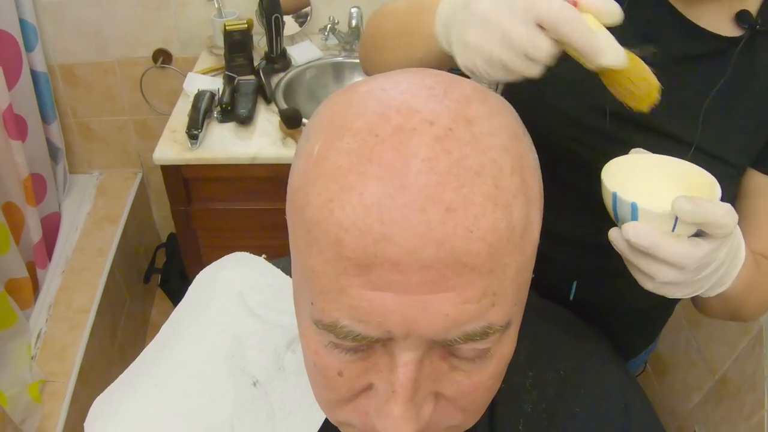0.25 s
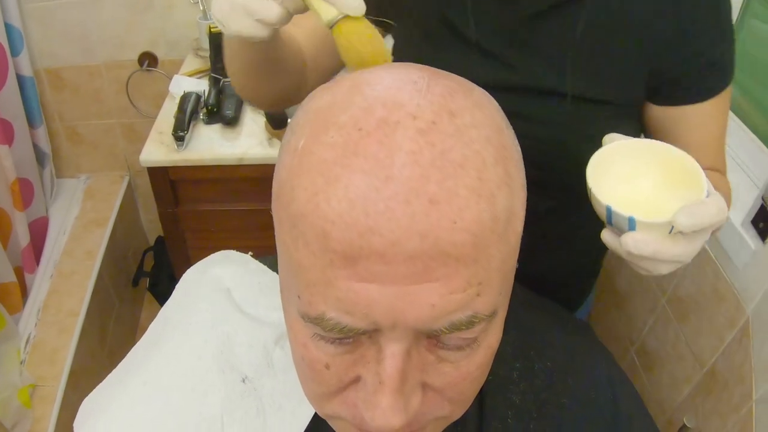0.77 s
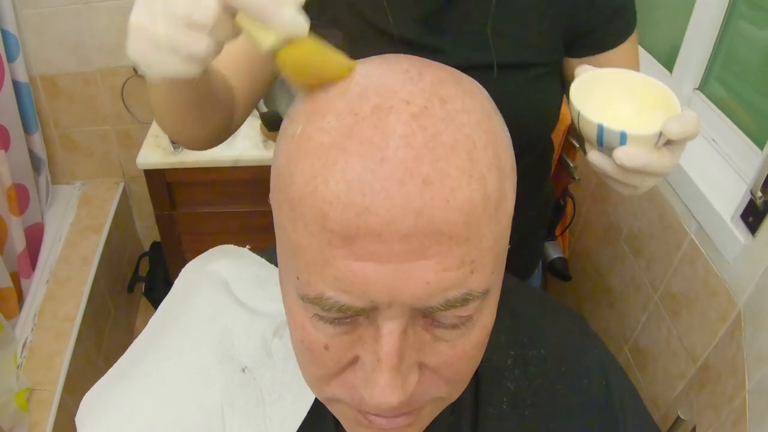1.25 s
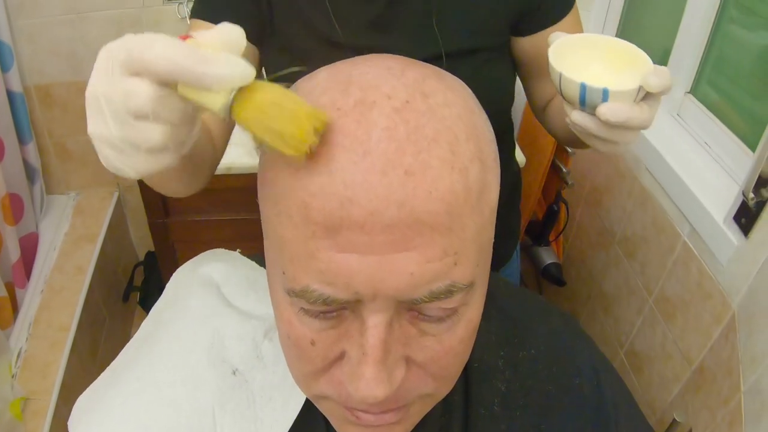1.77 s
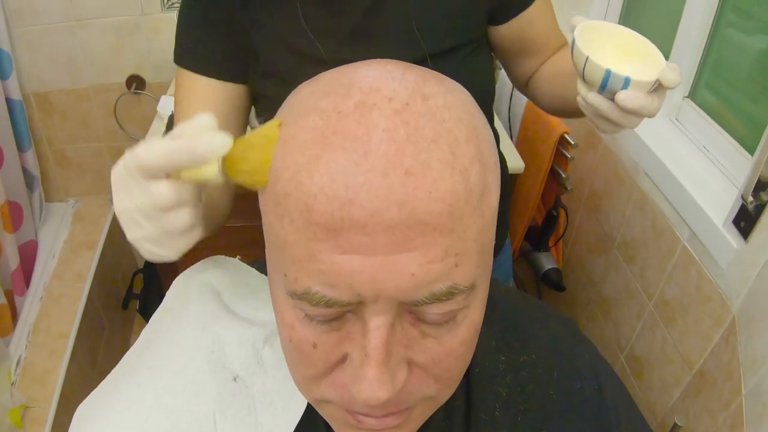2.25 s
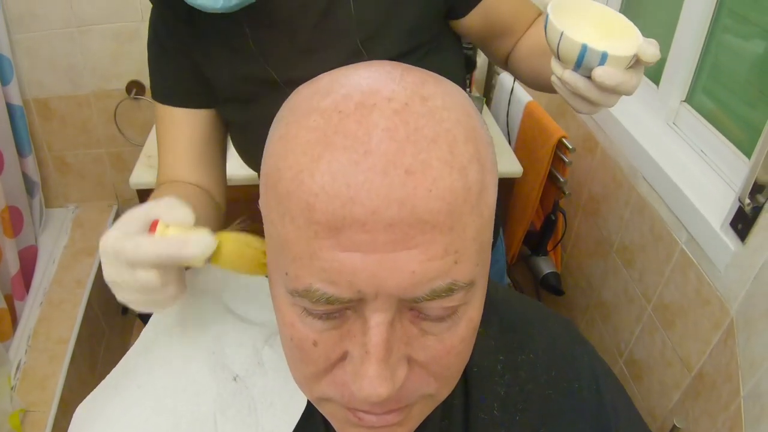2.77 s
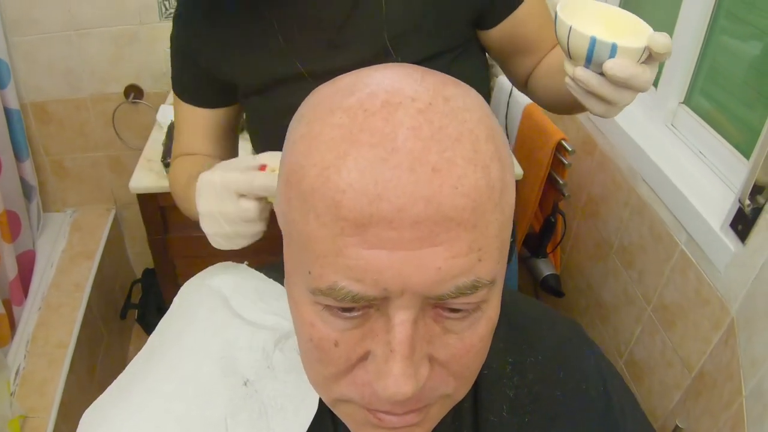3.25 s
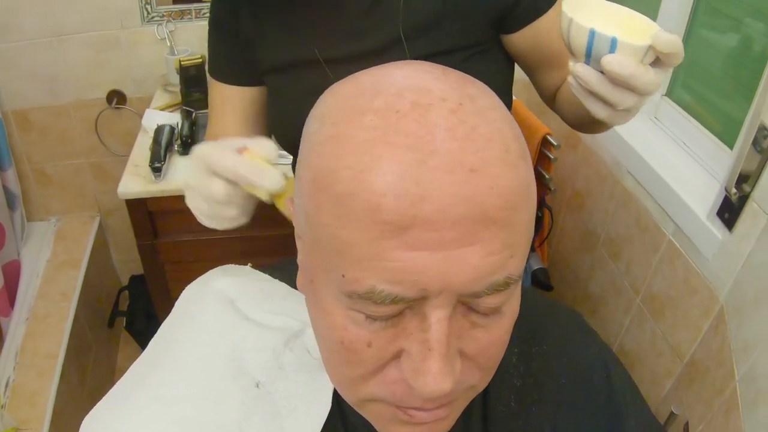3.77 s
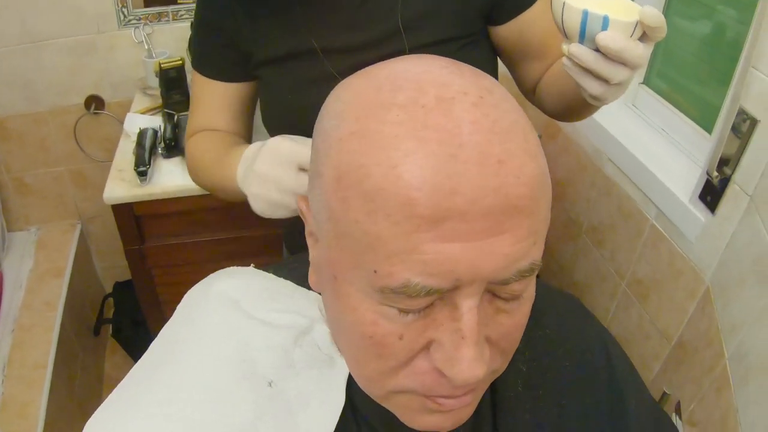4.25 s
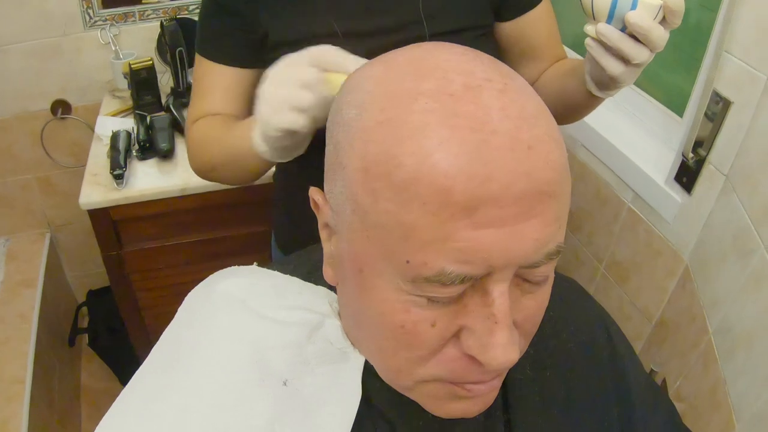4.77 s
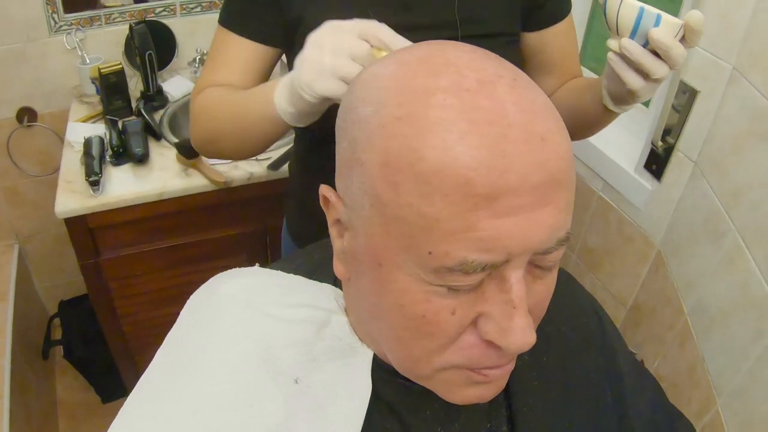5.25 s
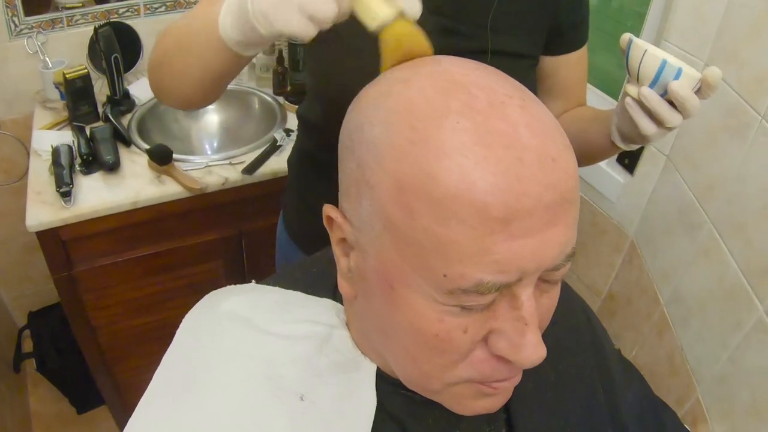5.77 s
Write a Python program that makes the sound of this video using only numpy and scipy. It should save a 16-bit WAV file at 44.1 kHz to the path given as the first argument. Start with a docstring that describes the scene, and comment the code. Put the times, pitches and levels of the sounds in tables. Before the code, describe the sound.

Close, quiet bristle strokes drag wet lather across skin, fizzing and ticking lightly over low room rumble, with a single dull thump midway.

```python
"""A soft brush works thin lather over a bare scalp in a small tiled room, about seven strokes a second.
Bristles slip on the skin in dense tiny clicks, heard as bright tips, a mid-range drag and a wet smear.
Bubbles burst in short rings under the brush, foam ticks now and then, something thumps softly once.
Under it lie shaped noise for hiss, rumble and low mids, a wavering hum and a slow pressure sway."""
import sys
import numpy as np
from scipy import signal
from scipy.fft import rfft, irfft
from scipy.io import wavfile
from scipy.ndimage import uniform_filter1d

SR = 44100
rng = np.random.default_rng(int(sys.argv[2]) if len(sys.argv) > 2 else 0)


def dump_mix(stems):
    """Bounce the given channels to the path in sys.argv[1] as a 16-bit WAV at rate SR."""
    frames = np.atleast_2d(stems).T  # one column per channel
    limited = np.clip(frames, -1, 1)  # hard clip at full scale
    pcm = np.round(limited * 32767).astype(np.int16)
    wavfile.write(sys.argv[1], SR, pcm)


N = 264600  # samples, 6 s


def brush():
    """One crowd of slips, bunched as tufts of hair catch, sounds in three ranges of bristle and skin."""
    # Spectra of the three ranges: (frequency [Hz], relative level [dB])
    tip_spectrum = [(5500, -48), (6800, -8), (8500, 1.5), (9300, 0.5), (10300, -5), (11500, -3.5),
                    (13200, 0.5), (14500, -6), (16000, -5)]
    drag_spectrum = [(1200, -25), (2000, 7.5), (3000, 10.5), (4500, 9), (6000, 8.5), (7000, 2), (9000, 1)]
    smear_spectrum = [(400, -6.5), (750, 2.5), (1000, 4), (1500, 4), (2200, -7.5), (3500, -51)]
    foam_db = -12  # against the drag noise
    tip_strokes, drag_strokes, smear_strokes = strokes()

    bunch_db = 1.0 * walk(60) + 1.13 * walk(250)
    crowd = slips(rate=14000, spread_db=2.2) * undb(bunch_db)

    tips = tip_strokes * coloured(tip_spectrum, crowd) * undb(0.65 * walk(10))
    drag_noise = coloured(drag_spectrum, crowd) * undb(1.8 * walk(60))
    drag = drag_strokes * (drag_noise + undb(foam_db) * foam())
    smear = smear_strokes * coloured(smear_spectrum, crowd) * undb(0.4 * walk(30))
    return tips + drag + smear


def strokes():
    """Each stroke swells and fades along a pointed bell; strokes that overlap add in power."""
    # Brush strokes: (peak [s], swell [s], fade [s], bristle tips [dB], drag of the tuft [dB],
    # wet smear [dB]); swell and fade each span 10 dB
    stroke_table = [(0.169, 0.083, 0.065, -74.5, -67.5, -73), (0.286, 0.091, 0.22, -77, -69.5, -74),
                    (0.599, 0.008, 0.149, -73, -72, -71), (0.736, 0.1, 0.043, -70.5, -65.5, -76),
                    (0.933, 0.069, 0.05, -60, -58.0, -65), (1.059, 0.014, 0.047, -60.5, -63, -63),
                    (1.149, 0.16, 0.066, -71.5, -65.0, -68.5), (1.313, 0.051, 0.044, -66, -63, -74.0),
                    (1.376, 0.1, 0.039, -65, -62.0, -70.5), (1.486, 0.0069, 0.075, -67.5, -65, -66.0),
                    (1.611, 0.168, 0.042, -66, -64.5, -73), (1.808, 0.088, 0.038, -64, -61, -73),
                    (1.927, 0.044, 0.071, -69, -69.5, -74.0), (2.013, 0.05, 0.066, -66.5, -64, -71.5),
                    (2.288, 0.028, 0.026, -71, -76, -76), (2.387, 0.2, 0.062, -72, -69, -73.5),
                    (2.698, 0.088, 0.055, -69, -66.5, -72.5), (2.837, 0.069, 0.14, -94.0, -71.0, -69),
                    (2.966, 0.065, 0.037, -60, -62.5, -77), (3.148, 0.066, 0.13, -68, -68, -72.5),
                    (3.257, 0.05, 0.042, -66.5, -61.0, -73), (3.427, 0.079, 0.037, -60.5, -62.5, -65.5),
                    (3.562, 0.03, 0.086, -66.5, -65.5, -74.0), (3.665, 0.24, 0.17, -92, -74, -71.5),
                    (3.861, 0.064, 0.05, -61.0, -63.0, -68.5), (4.02, 0.077, 0.063, -70.5, -67.5, -71.5),
                    (4.095, 0.125, 0.12, -81.0, -72, -69.5), (4.381, 0.055, 0.022, -68, -67.5, -71),
                    (4.517, 0.16, 0.043, -76, -74.5, -74.5), (4.648, 0.077, 0.024, -65.5, -66, -64.5),
                    (4.751, 0.13, 0.046, -74, -67.5, -70.5), (4.851, 0.035, 0.05, -62.5, -65.5, -60.5),
                    (4.941, 0.028, 0.13, -72.5, -69, -69.5), (5.101, 0.048, 0.071, -69.5, -69, -70),
                    (5.185, 0.021, 0.19, -73, -70.5, -71), (5.34, 0.033, 0.013, -73.0, -73, -74),
                    (5.434, 0.062, 0.024, -59.0, -59.0, -65.0), (5.618, 0.12, 0.058, -69, -65.0, -71.0),
                    (5.748, 0.057, 0.088, -73, -73, -76.0), (5.844, 0.032, 0.045, -64, -61.0, -67.0),
                    (5.968, 0.055, 0.2, -71, -68, -67.5)]
    pointed = 1.4  # power of time in the bell, 2 is round
    peak_s, swell_s, fade_s, *layers_db = np.transpose(stroke_table)[:, :, None]

    t = np.arange(0, N + 64, 64) / SR  # a point every 64 samples is fine enough
    side_s = np.where(t < peak_s, swell_s, fade_s)
    bell_db = -10 * (abs(t - peak_s) / side_s) ** pointed

    gains = []
    for db in layers_db:
        power = np.sum(undb(db + bell_db) ** 2, axis=0)
        gains.append(np.interp(np.arange(N) / SR, t, np.sqrt(power)))
    return gains


def slips(rate, spread_db):
    """Sudden releases at random moments, rate a second; a few are far bigger than most."""
    happens = rng.random(N) < rate / SR
    direction = np.sign(rng.standard_normal(N))
    return happens * direction * undb(spread_db * rng.exponential(size=N))


def foam():
    """Bubbles of many sizes burst under the brush, each a very short ring; rms 1."""
    sharpness = 36  # Q of each bubble
    pitches_hz = np.geomspace(706, 5980, num=24)
    bubbles = [ring(slips(rate=25, spread_db=2.0), hz, hz / sharpness) for hz in pitches_hz]
    return level(sum(bubbles), 0)


def foam_ticks():
    """Foam ticks are tiny damped rings, more noise than tone."""
    # Ticks: (time [s], level [dB], pitch [Hz])
    tick_table = [(.0714, -53, 5000), (.5989, -60, 6070), (1.0376, -55, 2600), (1.0500, -52, 5000),
                  (1.4828, -51, 4420), (1.924, -55, 3200), (2.0553, -53, 3200), (2.275, -52, 8000),
                  (2.2943, -52, 2800), (2.4044, -60, 8000), (2.7746, -50.5, 3870), (2.818, -49.5, 1900),
                  (3.4400, -47, 3100), (3.7757, -53, 2700), (4.6349, -50, 1200), (4.8176, -56.5, 2000),
                  (5.5588, -50, 8300), (5.9658, -54.5, 1630)]
    return knocks(tick_table, rise_s=.0001, t60=.005, noisy=1.3)


def soft_thump():
    """A soft thump is a low, slower damped ring with little noise."""
    # Thump: (time [s], level [dB], pitch [Hz])
    thump_table = [(3.3145, -45, 82)]
    return knocks(thump_table, rise_s=0.0031, t60=0.15, noisy=0.17)


def knocks(table, rise_s, t60, noisy):
    """Each event is a damped ring, partly a wide burst of noise around the same pitch."""
    out = np.zeros(N + SR)
    t = np.arange(SR // 2) / SR
    fade = (1 - np.exp(-t / rise_s)) * np.exp(-np.log(1000) * t / t60)  # t60: seconds to fall 60 dB
    for s, db, hz in table:
        burst = level(ring(rng.standard_normal(len(t)), hz, 2 * hz), 0)
        tone = np.sin(2 * np.pi * hz * t)
        start = int(s * SR)
        out[start:start + len(t)] += undb(db) * fade * (tone + noisy * burst)
    return out[:N]


def room():
    """The bed of the room: hiss, rumble, hum and low mids together."""
    return hiss() + rumble() + hum() + low_mids()


def hiss():
    """Nearly even broadband noise, weighted to the lows, with a slight drift in level."""
    # Room hiss spectrum: (frequency [Hz], relative level [dB])
    hiss_spectrum = [(35, -22.5), (60, -6), (90, -10), (130, -11), (250, -22.5), (500, -23), (1000, -25),
                     (2000, -30), (4000, -33.5), (8000, -38), (12000, -42), (16000, -48)]
    hiss_db = -68.5
    return coloured(hiss_spectrum) * undb(hiss_db + 0.76 * walk(5.0))


def rumble():
    """Low noise, strongest near 27 Hz, that swells and sinks."""
    # Rumble spectrum: (frequency [Hz], relative level [dB])
    rumble_spectrum = [(13, -14), (22, -5), (27.5, 12.5), (32, 1), (45, -12.5), (70, -22.5), (120, -42)]
    # Rumble level: (time [s], level [dB])
    rumble_level = [(0.04, -44.5), (0.4, -36.5), (0.58, -55), (0.78, -44), (1.87, -42.5), (1.92, -53.5),
                    (2.5, -41), (3.21, -45), (3.42, -56.5), (3.72, -37), (4.16, -54.5), (4.31, -37.5),
                    (4.41, -47), (4.61, -35), (4.67, -48), (4.8, -36.5), (4.92, -49), (4.97, -38),
                    (5.12, -37.5), (5.18, -52), (5.3, -38.5), (5.55, -50), (5.61, -42.5), (5.96, -39.5)]
    return coloured(rumble_spectrum) * undb(curves(rumble_level)[0])


def hum():
    """A tone of unsteady pitch that swells and sinks."""
    # Hum level: (time [s], level [dB])
    hum_level = [(0.04, -80), (0.44, -94), (0.57, -81.5), (0.67, -100), (1.01, -87), (1.64, -85),
                 (1.72, -91), (3.83, -72), (4.0, -89), (4.05, -77), (4.21, -80.5), (4.69, -66), (4.79, -74),
                 (4.84, -91), (4.9, -72.5), (4.99, -80), (5.22, -67.5), (5.48, -77), (5.51, -99),
                 (5.76, -79), (5.93, -96), (5.96, -65.5)]
    return wavering(160.5, wander=0.0062, rate=6) * undb(curves(hum_level)[0])


def low_mids():
    """Noise from 180 to 600 Hz, with a narrow peak at 343 Hz, that swells and sinks."""
    # Low mids level: (time [s], level [dB])
    mids_level = [(0.05, -70.5), (0.08, -74), (0.18, -72.5), (2.05, -77.5), (2.78, -76), (2.81, -73),
                  (3.43, -74.5), (3.48, -65), (3.53, -75.5), (4.21, -72), (4.31, -74.5), (4.7, -71),
                  (5.42, -74), (5.82, -71.5), (5.85, -78), (5.95, -71)]
    mids_spectrum = [(180, -2.0), (250, 2.5), (325, -5), (343, 5), (362, -4), (600, -6.5)]  # (Hz, dB)
    return coloured(mids_spectrum) * undb(curves(mids_level)[0])


def sway():
    """Air pressure rocking below hearing: two loose resonances and one nearly steady tone."""
    # Loose resonances: (centre [Hz], distance to the -30 dB points [Hz], rms level [dB])
    loose_modes = [(3.296, 2.59, -33), (5.7, 1.28, -39.5)]
    # Steadier tone: (time [s], level [dB])
    throb_level = [(0, -33), (.5, -35), (1, -29), (1.5, -33), (2, -32.5), (2.5, -25), (3, -24.5),
                   (3.5, -26), (4, -29.5), (4.5, -28.5), (5, -27.5), (5.5, -36), (6, -32)]
    out = undb(curves(throb_level)[0]) * wavering(12, wander=0.029, rate=1.475)
    for hz, width_hz, db in loose_modes:
        peak = [(hz - width_hz, -30), (hz, 0), (hz + width_hz, -30), (40, -90)]
        out = out + level(coloured(peak), db)
    return out


def wavering(hz, wander, rate):
    """A tone whose pitch drifts by about the fraction wander, rms 1."""
    pitch_hz = hz * (1 + wander * walk(rate))
    cycles = np.cumsum(pitch_hz) / SR + rng.random()
    return np.sqrt(2) * np.sin(2 * np.pi * cycles)


def coloured(points, x=None):
    """Noise, or the given sound, with its spectrum shaped by (Hz, dB) points, rms 1."""
    hz, db = np.transpose(points)
    f = np.maximum(np.arange(N // 2 + 1) * SR / N, 1)
    x = rng.standard_normal(N) if x is None else x
    shape_db = np.interp(np.log(f), np.log(hz), db, left=-90, right=-90)
    return level(irfft(rfft(x) * undb(shape_db), N), 0)


def ring(x, hz, width_hz):
    """Two-pole resonance, gain 1 at the centre."""
    return signal.lfilter(*signal.iirpeak(hz, hz / width_hz, SR), x)


def walk(rate):
    """Random levels held 1 / rate s and slewed twice; spread near 1."""
    k = int(SR / rate)
    held = np.repeat(rng.standard_normal(N // k + 1), k)
    return 1.264 * uniform_filter1d(uniform_filter1d(held, k), k)[:N]


def curves(table):
    """Columns of a timed table, one value a sample."""
    s, *columns = np.transpose(table)
    return [np.interp(np.arange(N) / SR, s, c) for c in columns]


def level(x, db):
    """Scale to an rms level."""
    return x * undb(db) / np.sqrt(np.mean(x ** 2))


def undb(db):
    """Decibels to gain."""
    return 10 ** (np.asarray(db) / 20)


def scene():
    """Brush and ticks up close, with the thump, over the room and the sway."""
    return (brush() + foam_ticks() + soft_thump() + room() + sway())[None]


def record(dry):
    """A steep low-pass cuts the top; the first value is set aside so the filter starts from rest."""
    top_hz = 15680
    sos = signal.ellip(12, .2, 80, top_hz, fs=SR, output="sos")  # 0.2 dB ripple, 80 dB stop
    return signal.sosfilt(sos, dry - dry[:, :1]) + dry[:, :1]


dry = scene()
out = record(dry)
dump_mix(out)
```